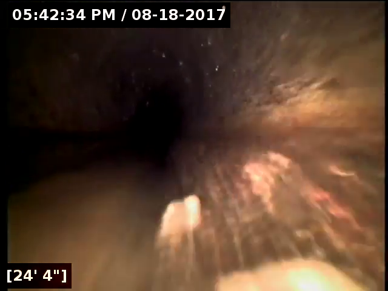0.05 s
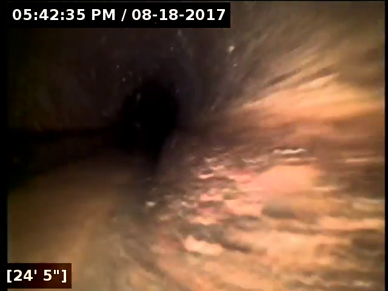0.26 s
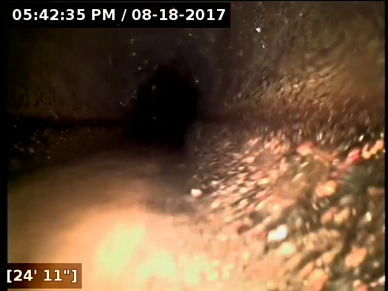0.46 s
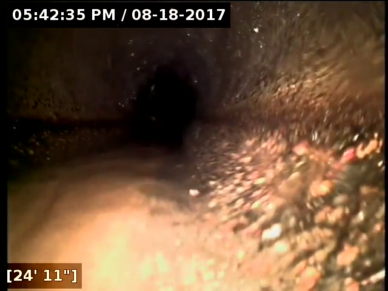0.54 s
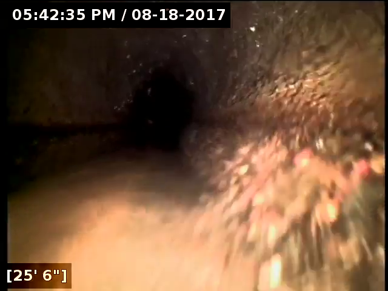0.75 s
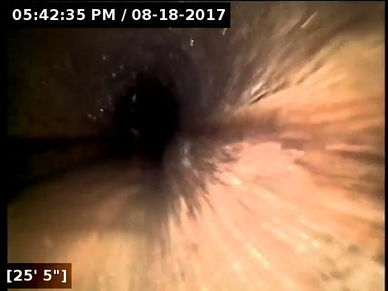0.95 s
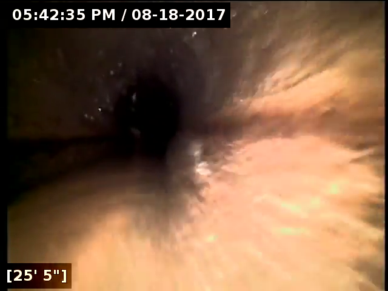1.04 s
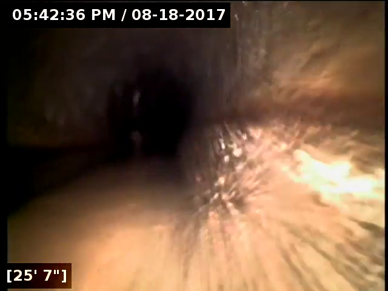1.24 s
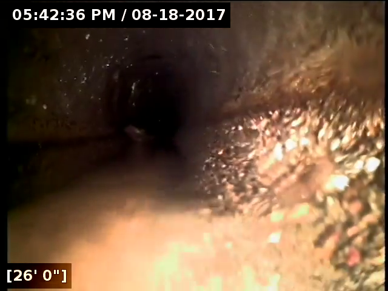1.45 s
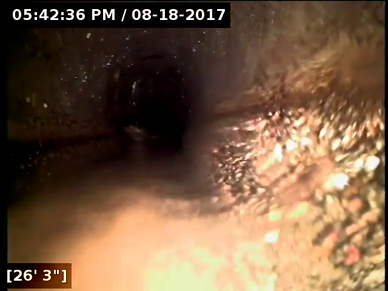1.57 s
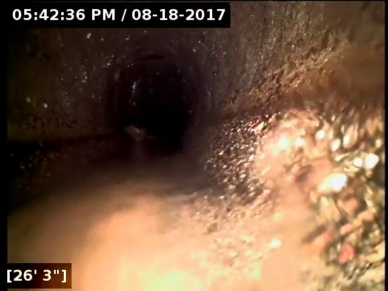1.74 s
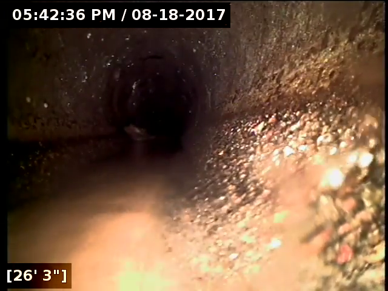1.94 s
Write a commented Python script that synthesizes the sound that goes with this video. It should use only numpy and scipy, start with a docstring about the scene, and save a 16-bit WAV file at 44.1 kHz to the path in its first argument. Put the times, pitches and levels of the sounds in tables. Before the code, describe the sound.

In a quiet place, a cable slides into a drain line with uneven knocks and soft bumps from its coil. The scraping swells midway, a hiss follows a hard knock, and the movement dies down.

```python
"""A push cable is fed down a drain line: it rasps and hisses as it slides, its coil rumbles softly.
First knocks on the guide ring short and dull; at 0.32 s all sound drops out for 0.1 s.
A hard knock follows, then soft coil bumps, and the rasp swells around 1 s among lighter knocks.
After another hard knock at 1.4 s the hiss peaks and the sliding fades toward a quiet background.
The sound is narrow-band throughout, with a notch in the treble."""
import sys
import numpy as np
from scipy import signal
from scipy.fft import rfft, irfft, next_fast_len
from scipy.io import wavfile

SR = 44100
rng = np.random.default_rng(int(sys.argv[2]) if len(sys.argv) > 2 else 0)


def generate_wav(signal):
    """Clip the signal to [-1, 1] and save it as 16-bit WAV at the path in sys.argv[1]."""
    frames = np.transpose(np.atleast_2d(signal))
    scaled = np.clip(frames, -1, 1) * 32767
    pcm = np.round(scaled).astype(np.int16)
    wavfile.write(sys.argv[1], SR, pcm)


N = 88244
T = np.arange(N) / SR
RING_T = np.arange(SR // 5) / SR
ZONE_EDGES_HZ = [400, 1700, 4000]   # bass | middle | bite | treble


def knocks():
    """Hard cable contacts: a bright snap, the body's ring, two cable pings, a deep thud of the frame."""
    # t/s, ring stretch, favoured f/Hz, ping f/Hz, ping level/dB, high ping f/Hz,
    # bass, middle, bite, treble level/dB
    contacts = [(0.0914, 1.13, 241, 1155, -29.5, 5230, -30.5, -30.5, -32, -47.5),
                (0.1969, 0.86, 880, 3220, -45.5, 6070, -67, -56, -48.5, -59),
                (0.235, 0.82, 1860, 3520, -38, 4920, -65, -37, -33, -58),
                (0.4474, 1.06, 1217, 3225, -39, 5760, -44.5, -41, -40, -50),
                (0.5346, 0.96, 600, 2312, -24.5, 6370, -29.5, -25.5, -27.5, -47.5),
                (0.848, 1.1, 1860, 2924, -37.5, 4550, -41.5, -52, -41, -50),
                (1.0054, 1.06, 248, 3286, -44.5, 6200, -34, -38.5, -49, -65),
                (1.077, 0.87, 555, 2260, -49, 6340, -54, -48, -51.5, -69),
                (1.2087, 1.2, 576, 2270, -42.5, 6250, -73, -48.5, -47.5, -69),
                (1.4116, 0.63, 255, 1304, -23.5, 4800, -32.5, -29, -35.5, -51),
                (1.7645, 0.67, 1295, 2320, -55.5, 5500, -64, -58, -58, -53.5)]
    snap_t60_s, ping_t60_s = 0.0084, 0.038
    out = 0
    for start_s, stretch, favoured_hz, ping_hz, ping_db, high_hz, *zone_db in contacts:
        bass_db, treble_db = zone_db[0], zone_db[-1]
        snap = from_db(treble_db - 11 - 60 * RING_T / snap_t60_s) * band_noise(3200, 8200)
        ping = from_db(ping_db) * mode(ping_hz, ping_t60_s, stretch)
        high_ping = from_db(treble_db + 4) * mode(high_hz, ping_t60_s, stretch)
        thud = from_db(bass_db - 18.5) * mode(hz=107.9, t60_s=0.13, stretch=stretch)
        body = blow(favoured_hz, zone_db, stretch)
        out = out + placed(snap + body + ping + high_ping + thud, start_s)
    return out


def bumps():
    """Soft coil contacts press on gradually and reach only the lower modes."""
    # t/s, favoured f/Hz, bass level/dB, middle level/dB
    contacts = [(.022, 255, -46.5, -56), (.456, 255, -51, -44.5), (.491, 255, -42.5, -47),
                (.660, 255, -44, -47.5), (0.719, 318, -44, -58), (0.773, 255, -37, -50),
                (.806, 318, -40, -43.5), (.866, 530, -50, -35), (1.013, 255, -40.5, -47),
                (1.465, 255, -42.5, -42.5), (1.597, 555, -44.5, -36.5), (1.619, 255, -47, -45),
                (1.800, 286, -45.5, -46)]
    rise_s = 0.015
    press = np.minimum(RING_T / rise_s, 1)
    return sum(placed(press * blow(favoured_hz, zone_db), start_s)
               for start_s, favoured_hz, *zone_db in contacts)


def blow(favoured_hz, zone_db, stretch=1):
    """A blow excites body modes and a dense clatter; its hardness sets the level of each zone."""
    # modes of cable and guide: f/Hz, relative level/dB, t60/s
    body_modes = [(255, -3, .11), (318, -1.5, 0.078), (452.8, -0.5, 0.12), (551.7, 3, 0.043),
                  (880, -6, 0.062), (959, -7, 0.14), (1155, -2, 0.081), (1295, 7.5, 0.035),
                  (1337, -2.5, .045), (1622, 1.5, 0.035), (1860, -3, 0.018), (2227, -6, 0.036),
                  (2349, -6, .035), (2771, -11, 0.1), (3046, -7, 0.023), (3360, -15, 0.027),
                  (4833, -2.5, 0.038), (5230, -3.5, 0.067), (6400, 0, 0.028)]
    # clatter band per zone: low f/Hz, high f/Hz
    clatter_bands = [(220, 292), (430, 1400), (1700, 2800), (4600, 7400)]
    favour_db, favour_octaves, spread_db = 7.5, 0.22, 1.5
    ring_db, clatter_db = 0.5, -7
    hz, mode_db, t60_s = np.transpose(body_modes)
    mode_zone = np.searchsorted(ZONE_EDGES_HZ, hz)
    # the contact point favours modes near one pitch
    favour = np.exp(-(np.log2(hz / favoured_hz) / favour_octaves) ** 2)
    strengths = from_db(mode_db + favour_db * favour + spread_db * rng.standard_normal(len(hz)))
    out = 0
    for zone, db in enumerate(zone_db):
        modes = np.flatnonzero(mode_zone == zone)
        ring = sum(strengths[m] * mode(hz[m], t60_s[m], stretch) for m in modes)
        ring /= np.linalg.norm(strengths[modes])
        low_hz, high_hz = clatter_bands[zone]
        centre_hz = np.sqrt(low_hz * high_hz)
        clatter_t60_s = 0.068 * (1000 / centre_hz) ** 0.18
        clatter = band_noise(low_hz, high_hz) * swell(RING_T / stretch, centre_hz, clatter_t60_s)
        out = out + from_db(db) * (from_db(ring_db) * ring + from_db(clatter_db) * clatter)
    return out


def mode(hz, t60_s, stretch):
    """One resonance at random phase; stretch scales its envelope in time."""
    phase = 2 * np.pi * hz * RING_T + rng.uniform(0, 2 * np.pi)
    return np.sin(phase) * swell(RING_T / stretch, hz, t60_s)


def swell(t, hz, t60_s):
    """Ring envelope, peak 1. Low notes travel slower along the cable and arrive later."""
    lag_cycles, build_cycles = 0.83, 1.02
    age_s = np.maximum(t - lag_cycles / hz, 0)
    bass_build_s = 0.007 / (1 + (hz / ZONE_EDGES_HZ[0]) ** 4)   # heavy low modes build slowly
    build_s = 0.00077 + build_cycles / hz + bass_build_s
    envelope = (1 - np.exp(-(age_s / build_s) ** 2)) * from_db(-60 * age_s / t60_s)
    return envelope / envelope.max()


def sliding_cable():
    """The turning coil rumbles; the cable rasps and hisses through its guide."""
    # friction spectra: f/Hz, relative density/dB
    rumble_spectrum = [(60, -40.5), (110, -16.5), (200, -1.5), (228, -2), (255, 1), (285, -1), (320, -5),
                       (390, -6.5), (460, -4), (555, -2), (720, -4.5), (1300, -13.5), (2000, -21),
                       (3500, -50)]
    rasp_spectrum = [(300, -28.5), (700, -11.5), (1050, -9.5), (1300, 1), (1700, -7.5), (1950, 2.5),
                     (2230, 4.5), (2450, -1.5), (2700, -2), (3000, -1), (3300, 0.5), (3800, -14),
                     (5000, -16), (8500, -46.5)]
    hiss_spectrum = [(2000, -22.5), (3600, -17.5), (4600, -4.5), (5500, 4), (6500, 5), (7400, -0.5),
                     (8200, -12), (8900, -35.5)]
    # friction envelopes: t/s, level/dB
    rumble_levels = [(0, -52.5), (.2, -54.5), (.31, -55.5), (.44, -46.5), (.52, -46.5), (.62, -55),
                     (.75, -55.5), (.84, -45), (.9, -46), (.96, -52), (1.2, -51), (1.29, -56.5), (1.4, -51),
                     (1.55, -55), (1.62, -53.5), (1.72, -57), (1.83, -56), (2, -58.5)]
    rasp_levels = [(0, -49.5), (.17, -55.5), (.25, -56.5), (.31, -62), (.44, -53.5), (.57, -56.5),
                   (.62, -66), (.8, -67.5), (.86, -54.5), (.885, -47.5), (.92, -51.5), (1.01, -48.5),
                   (1.05, -51.5), (1.13, -52.5), (1.22, -50.5), (1.26, -59.5), (1.39, -60), (1.46, -57.5),
                   (1.55, -55), (1.62, -58), (1.7, -66.5), (2, -71)]
    hiss_levels = [(0, -62), (.14, -65), (.29, -68), (.43, -58.5), (.48, -64.5), (.52, -60), (.56, -66),
                   (.592, -50), (.61, -64.5), (.71, -64.5), (.77, -73), (.84, -69), (.92, -63.5),
                   (1.02, -61), (1.1, -68), (1.19, -62.5), (1.27, -70), (1.4, -69.5), (1.45, -60),
                   (1.52, -51.5), (1.6, -55), (1.63, -63), (1.652, -52), (1.68, -67), (1.8, -66),
                   (1.92, -73), (2, -69)]
    rumble = friction(rumble_spectrum, slips_per_s=330, size_db=0.5, smooth_db=11.5,
                      flutter_db=1.0, flutter_hz=10)
    rasp = friction(rasp_spectrum, slips_per_s=1400, size_db=-3.5, smooth_db=7.5,
                    flutter_db=1.2, flutter_hz=31)
    hiss = friction(hiss_spectrum, slips_per_s=4400, size_db=7, smooth_db=7,
                    flutter_db=1.2, flutter_hz=140)
    return level(rumble_levels) * rumble + level(rasp_levels) * rasp + level(hiss_levels) * hiss


def friction(spectrum, slips_per_s, size_db, smooth_db, flutter_db, flutter_hz):
    """Tiny slips of uneven size over smooth rubbing, fluttering in strength; rms 1."""
    sizes = from_db(size_db * np.minimum(rng.exponential(1, N), 4))
    signs = rng.choice([-1, 1], N)
    slips = rms_one(sizes * signs * (rng.random(N) < slips_per_s / SR))
    force = slips + from_db(smooth_db) * rng.standard_normal(N)
    return coloured(force * from_db(flutter_db * drift(flutter_hz)), spectrum)


def background():
    """Quiet steady noise, mostly low, with a second peak at 1.5 kHz."""
    # noise spectrum: f/Hz, relative density/dB
    spectrum = [(20, 5.5), (45, 6.5), (100, 7), (160, 14.5), (300, -19), (700, -15), (1500, 2.5),
                (3000, -46.5), (8000, -65.5)]
    return from_db(-59) * coloured(rng.standard_normal(N), spectrum)


def from_db(db):
    """Decibels to gain."""
    return 10 ** (np.asarray(db) / 20)


def rms_one(x):
    """Scale to unit power."""
    return x / np.sqrt(np.mean(x ** 2) + 1e-20)


def level(rows):
    """Gain over time from rows of t/s, level/dB."""
    return from_db(np.interp(T, *np.transpose(rows)))


def drift(corner_hz):
    """Random wander: low-passed noise, rms 1."""
    hop, settle_steps = 40, 2000
    pole = np.exp(-2 * np.pi * corner_hz * hop / SR)
    noise = rng.standard_normal(N // hop + settle_steps + 2)
    slow = signal.lfilter([1], [1, -2 * pole, pole * pole], noise)[settle_steps:]
    return np.interp(np.arange(N) / hop, np.arange(len(slow)), rms_one(slow))


def band_noise(low_hz, high_hz):
    """Band-passed noise, one ring long; rms 1."""
    bandpass = signal.butter(2, [low_hz, high_hz], "band", fs=SR, output="sos")
    return rms_one(signal.sosfilt(bandpass, rng.standard_normal(len(RING_T))))


def coloured(x, spectrum):
    """Shape x by a spectrum, minimum phase so nothing sounds early; rms 1."""
    size = 2 * next_fast_len(N)
    hz, db = np.transpose(spectrum)
    bin_hz = np.arange(size // 2 + 1) * SR / size
    shape_db = np.interp(np.log(bin_hz + 1), np.log(hz), db)
    cepstrum = irfft(np.log(from_db(shape_db)))
    causal = np.r_[cepstrum[0], 2 * cepstrum[1:size // 2]]
    response = np.exp(rfft(causal, size))
    return rms_one(irfft(rfft(x, size) * response)[:N])


def placed(sound, start_s):
    """A short sound set at its start time."""
    return np.r_[np.zeros(int(start_s * SR)), sound, np.zeros(N)][:N]


def scene():
    """Knocks, bumps and sliding over the background; mono."""
    floor = background()
    return (knocks() + bumps() + sliding_cable() + floor)[None]


def record(dry):
    """Treble notch, one dropout, steep low-pass."""
    notch_hz, width_hz, leak_db = 4031, 405, -22
    drop_start_s, drop_end_s, cutoff_hz = 0.322, 0.427, 8750
    edges_hz = [notch_hz - width_hz / 2, notch_hz + width_hz / 2]
    notch = signal.butter(2, edges_hz, "bandstop", fs=SR, output="sos")
    notched = signal.sosfilt(notch, dry) + from_db(leak_db) * dry
    live = (T < drop_start_s) | (T > drop_end_s)
    lowpass = signal.ellip(10, 0.2, 80, cutoff_hz, fs=SR, output="sos")
    return signal.sosfilt(lowpass, notched * live)


dry = scene()
out = record(dry)
generate_wav(out)
```